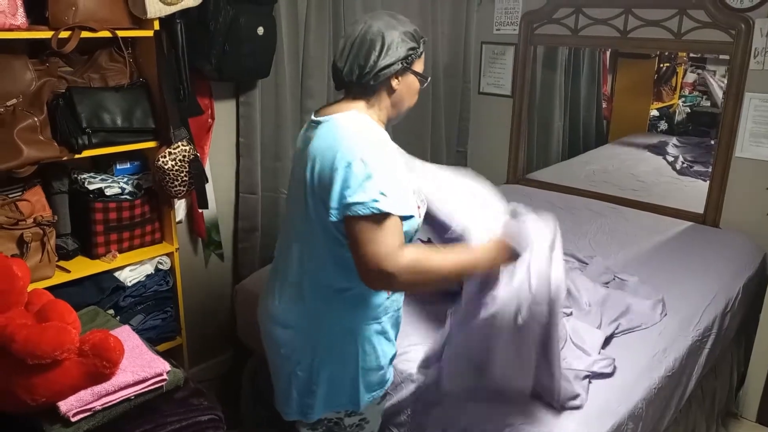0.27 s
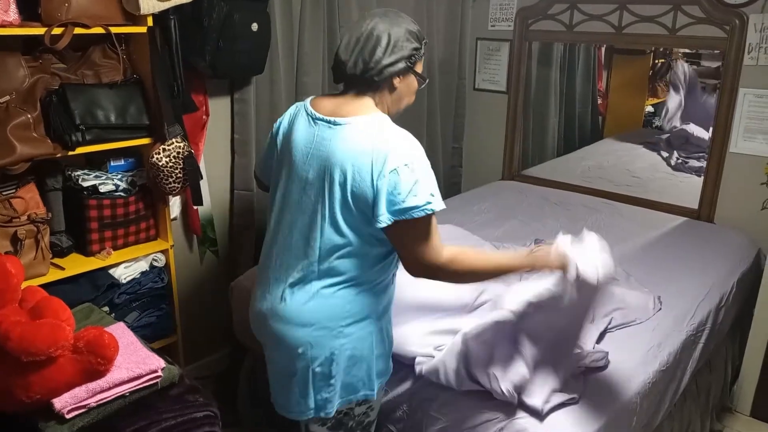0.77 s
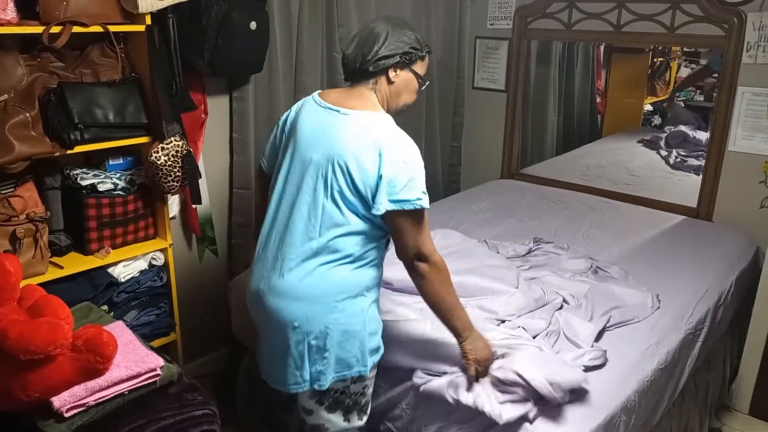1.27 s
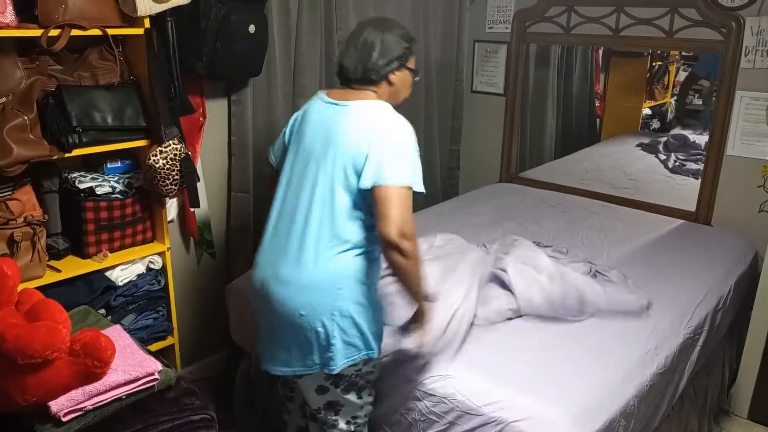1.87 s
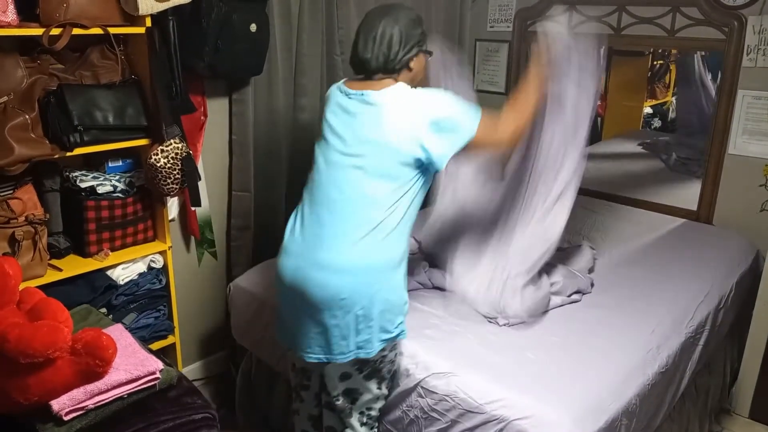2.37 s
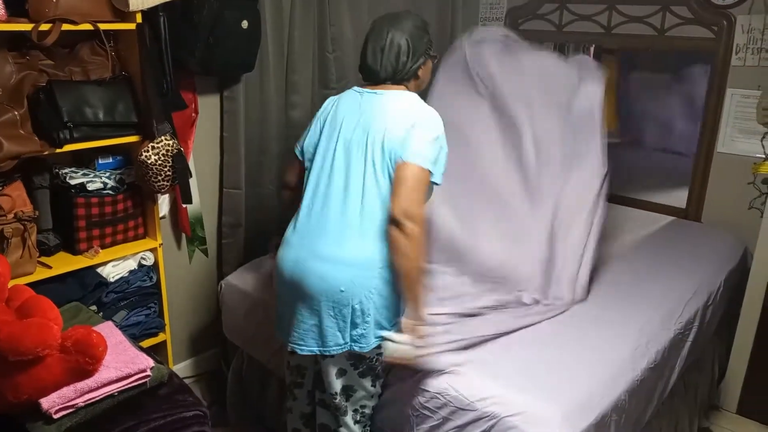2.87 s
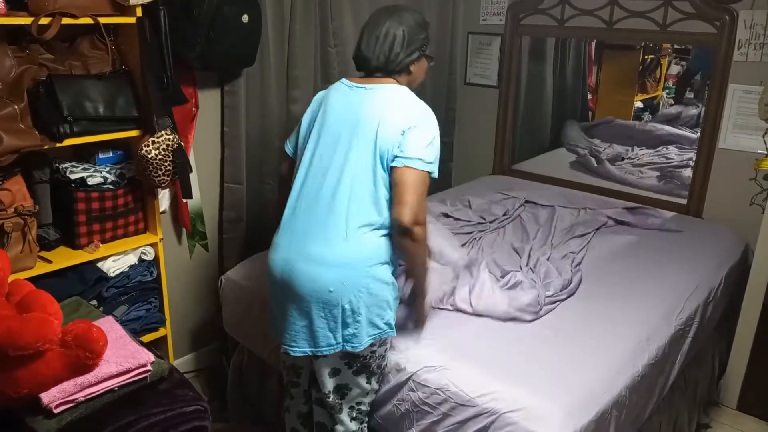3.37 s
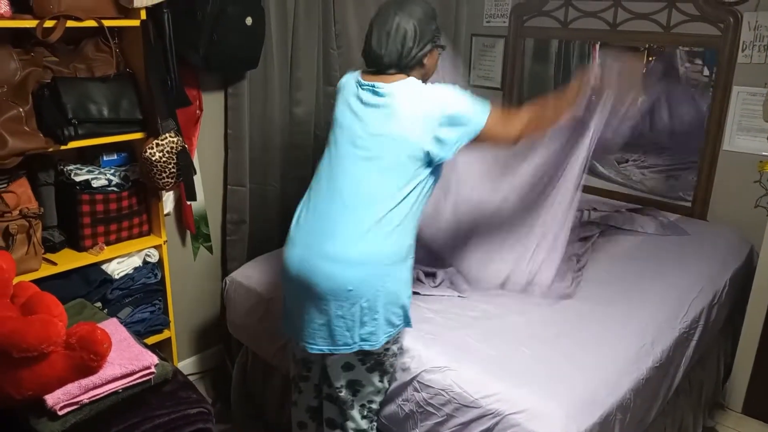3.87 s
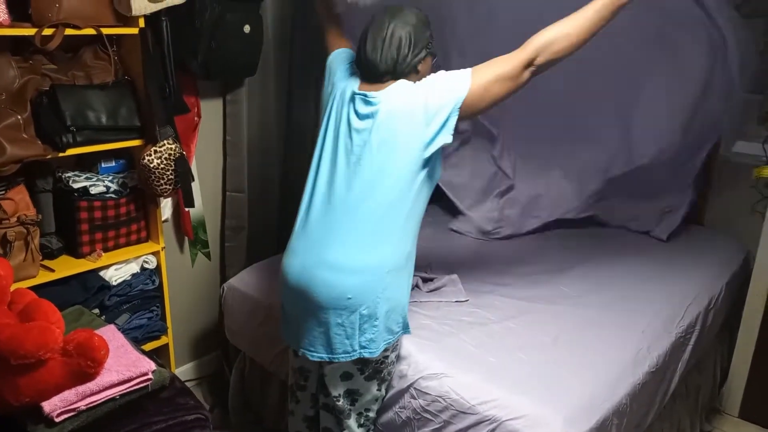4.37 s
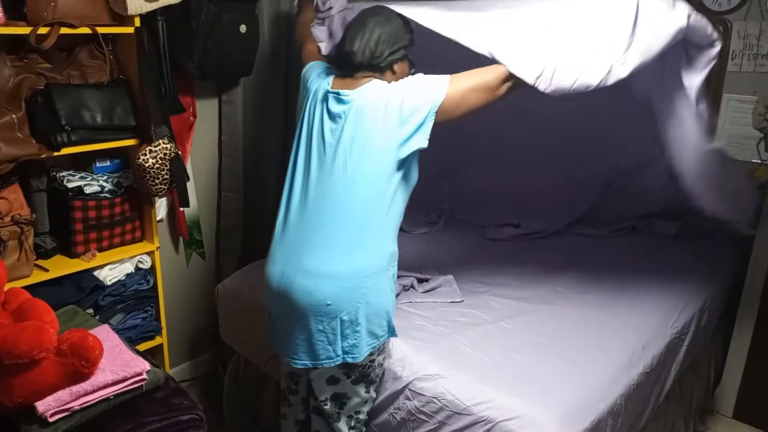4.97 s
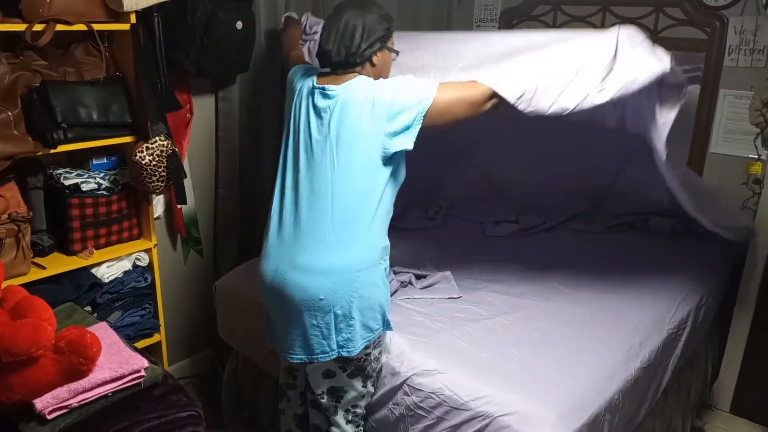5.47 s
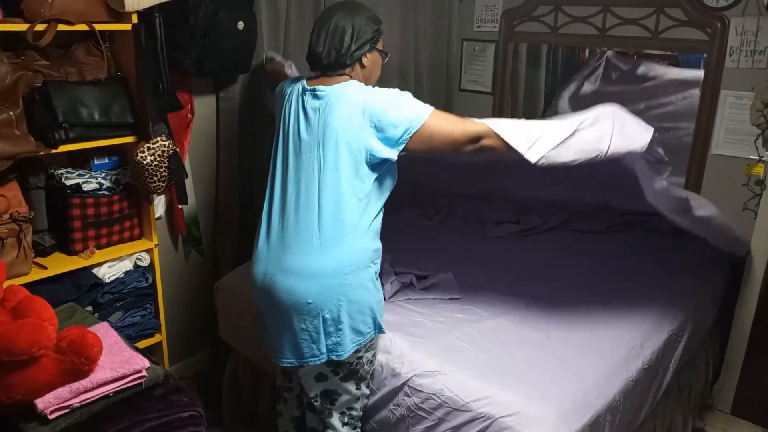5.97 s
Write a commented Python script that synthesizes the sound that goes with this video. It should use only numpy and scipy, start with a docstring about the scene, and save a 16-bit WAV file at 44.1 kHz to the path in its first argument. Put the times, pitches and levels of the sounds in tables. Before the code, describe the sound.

In a small bedroom, a couple of metres from the microphone, someone handles a bed sheet with soft rubs and swishes. A brisk shake brings a burst of flapping cloth, and a second, lighter shake follows. Things grow quieter as the sheet drifts down, with a brief crackle of fabric pulling tight and a few soft, dull footsteps. A steady high hiss, faint hum and low rumble lie underneath.

```python
"""Light swishes and a small flap: a cotton bed sheet is gathered in a small bedroom, then shaken out
twice and left to float down over the bed. Sliding threads swish and rub, loose folds flutter and slap
the air, creases snap taut, and air puffs from under the falling sheet. Feet shift softly, mostly at
the end. A steady high hiss, a faint hum and a low rumble lie under it all."""
import sys
import numpy as np
from scipy import signal
from scipy.fft import rfft, irfft, next_fast_len
from scipy.io import wavfile
from scipy.ndimage import map_coordinates

SR = 44100
rng = np.random.default_rng(int(sys.argv[2]) if len(sys.argv) > 2 else 0)


def persist_wave(psi):
    """Save psi, clipped to +-1, as 16-bit WAV."""
    counts = np.round(np.clip(psi, -1, 1) * 32767).astype(np.int16)
    wavfile.write(sys.argv[1], SR, np.atleast_2d(counts).T)


N = 274292

# swings of the sheet: t/s, length/s, start effort/dB, end effort/dB, extra rub/dB, extra swish/dB
SHEET_SWINGS = [(0.267, .13, -53.5, -49.5, -1.5, -2), (1.146, 0.013, -61, -62, -1, 0),
                (1.443, 0.21, -54, -69, 0.5, 2), (1.712, 0.056, -56.5, -51, -1.5, 0),
                (1.807, 0.068, -44.5, -45.5, 1.5, 3), (2.114, 0.071, -46.5, -39.5, -0.5, 0),
                (2.211, 0.16, -40.5, -40, 2, 1.5), (2.395, 0.12, -40, -48, -11, -7),
                (2.558, 0.063, -24.5, -29.5, -4, -3), (2.656, .06, -34, -31, 1.5, -1),
                (2.715, .10, -38, -41.5, 3.5, 5.5), (2.841, 0.077, -40.5, -43.5, -2, -8.5),
                (3.082, 0.12, -52.5, -48, 1.5, 3), (3.381, 0.1, -45, -50, -3, -2.5),
                (3.624, 0.11, -55.5, -54, 7, 2.5), (3.755, .16, -36, -39.5, -0.5, -2),
                (3.96, 0.096, -53.5, -64, 0, 2.5)]
# light sliding in the hands: t/s, level/dB
HAND_SLIDING = [(0, -57.5), (1.3, -55), (2.0, -57.5), (3.0, -54.5), (4.1, -52.5), (4.35, -63.5),
                (4.6, -57.5), (4.8, -65.5), (5.3, -64), (6.03, -57.5), (6.22, -64.5)]
# folds slapping the air: t/s, push peak/dB, slap re push/dB, ripple re push/dB
FOLD_FLAPS = [(.276, -42.5, -2, 1), (0.295, -40, -27, -22), (2.2234, -26.5, 4, -3),
              (2.269, -27, -16, -15.5), (2.539, -25.5, -6.5, -9.5), (2.553, -15, -8, -15),
              (2.624, -19.5, -23, -11.5), (2.668, -33, 9.5, -4.5), (2.707, -18, -6, -10),
              (2.722, -22, -12.5, -5.5), (3.765, -28.5, -25, -4), (3.828, -34.5, 4.5, -8),
              (3.891, -26, -11, -8.5), (3.921, -26, -36, -6.5), (3.948, -31, -32, -4)]
# creases pulling taut: t/s, level/dB, crack re zip/dB, crack f/Hz, t60/s
CREASE_SNAPS = [(.2754, -49.5, 8.5, 1750, .06), (1.261, -43.5, -22, 1530, .08),
                (1.482, -33, -4.5, 2670, 0.11), (2.273, -41.5, 3, 1560, .06), (2.3445, -38, 3, 1420, 0.089),
                (2.575, -34, 7, 2200, 0.051), (2.7042, -35.5, -1, 1650, .06),
                (2.7124, -27, -17, 1694, .064), (3.3797, -33.5, -1, 2080, .06),
                (3.3984, -42.5, 2, 2140, .16), (3.4494, -44, 2, 2360, 0.14),
                (3.7804, -41.5, 0, 1580, 0.035), (4.9491, -36, -25, 3500, 0.17),
                (4.9564, -34.5, -35, 2360, .04), (4.9674, -37, -17, 2710, 0.06),
                (4.9876, -31.5, -15, 2160, .1)]
# layer dragged over layer: t/s, swish/dB, rub/dB, rub f/Hz, half width/s
LAYER_TUGS = [(0.411, -50, -54, 2500, 0.0087), (.773, -50.5, -60, 2120, 0.028),
              (1.151, -46.5, -51.5, 694, 0.011), (1.308, -51, -59, 1450, 0.018),
              (1.479, -48, -58.5, 880, 0.016), (2.581, -35.5, -37.5, 1850, 0.011),
              (2.711, -31.5, -32, 1040, 0.0086), (4.46, -57.5, -68.5, 904, .035),
              (5.005, -67, -54.5, 2140, 0.023)]
# puffs from under the sheet: t/s, level/dB
AIR_PUFFS = [(4.041, -55.5), (4.171, -55.5), (4.309, -66), (4.46, -66.5), (4.59, -66), (4.79, -67),
             (5.78, -73), (5.96, -71), (6.09, -74)]
# footfalls and shifts of weight: t/s, level/dB
FOOT_STEPS = [(.925, -62), (1.83, -51), (4.913, -58), (5.069, -58), (5.362, -58), (5.775, -55.5),
              (6.015, -42), (6.076, -51)]
# folds pushing air: f/Hz, level/dB
FOLD_SPECTRUM = [(25, -39.5), (60, -12), (88, -11), (115, -9), (160, -6), (210, 0.5), (300, -2.5),
                 (345, -8.5), (385, -5), (460, -10), (540, -23), (660, -15), (1000, -21.5), (1250, -31.5),
                 (5000, -47.5)]
# slapping folds: f/Hz, level/dB
SLAP_SPECTRUM = [(150, -30), (550, 1), (750, 11), (1000, 7), (1400, -15), (2200, -14.5), (5000, -40)]
# rubbing crease: f/Hz, level/dB
CREASE_SPECTRUM = [(400, -25), (850, -8.5), (1500, 0.5), (2200, -1.5), (2800, -4.5), (4200, -7.5),
                   (6500, -23), (12000, -42.5)]
# slipping threads: f/Hz, level/dB
WEAVE_SPECTRUM = [(900, -23.5), (2500, -18), (4000, -8), (5200, -6.5), (6500, 0.5), (7450, 0.5),
                  (8200, -14.5), (9100, -18.5), (10200, -15), (11500, -9), (12800, -15), (13900, -21),
                  (14800, -7), (15800, -7)]
# air spilling past the hem: f/Hz, level/dB
AIR_SPECTRUM = [(40, -13), (140, -12), (200, -4), (280, -1.5), (400, -19), (600, -25), (2000, -60)]
# heel on the floor: f/Hz, level/dB
HEEL_SPECTRUM = [(20, -21), (50, 1), (90, 2), (160, -9), (300, -31), (1000, -53)]
# bedroom decay: f/Hz, t60/s
ROOM_DECAY = [(100, 0.77), (300, 0.17), (2000, 0.2), (12000, 0.24)]
# high hiss: f/Hz, level/dB
HISS_SPECTRUM = [(300, -12), (700, -10), (1200, -17), (2000, -27), (3200, -64), (5000, -13), (5800, 3),
                 (7400, -1), (8200, -6), (9000, -25), (11500, -6.5), (13800, -19.5), (15000, -10.5),
                 (15800, -6)]
# narrow bands singing in the hiss: f/Hz, width/Hz, level/dB
WHINE_BANDS = [(1360, 120, -12), (1889, 96, 0), (3763, 74, 3), (4274, 55, 8), (4484, 135, 3.5),
               (5020, 200, -8), (5400, 93, 2), (5633, 53, 10.5), (5650, 150, 1), (6300, 28, 9.5),
               (6860, 190, 7.5), (7180, 110, 9.5), (7480, 68, 11), (8320, 190, 0.5)]
# low rumble: f/Hz, level/dB
RUMBLE_SPECTRUM = [(20, -27.5), (50, -6), (88, -2.5), (125, 0), (250, -12.5), (450, -19), (900, -27),
                   (2500, -79)]


def moving_cloth():
    """Folds buckle in small pushes of air; bunches rub in coarse grains, threads slip in fine ones."""
    flutter_db, rub_db, swish_db = cloth_levels()
    ripple = wobble(rate_hz=45)  # waves running through the cloth
    folds = coloured(grains(rate_hz=900, spread_db=4), FOLD_SPECTRUM)
    flutter = amp(flutter_db - 1 + 1.6 * ripple) * shifting(folds, depth_db=1, size=1024)
    patter_db = 0.62 * flutter_db + 0.48 * rub_db  # fold on fold: needs both flutter and sliding
    slaps = coloured(grains(rate_hz=650, spread_db=0), SLAP_SPECTRUM)
    patter = amp(patter_db - 0.5 + 1.2 * ripple) * shifting(slaps, depth_db=4, size=512)
    catches = coloured(grains(rate_hz=2200, spread_db=3), CREASE_SPECTRUM)
    rub = amp(rub_db - 3 + 2.1 * ripple) * shifting(catches, depth_db=2.5, size=256)
    swish_gain = amp(swish_db - 1.5 + 1.7 * wobble(rate_hz=49))
    threads = coloured(grains(rate_hz=12000, spread_db=1.5), WEAVE_SPECTRUM)
    swish = swish_gain * shifting(threads, depth_db=3, size=512)
    return flutter + patter + rub + swish


def cloth_levels(brisk_db=-40.5, brisk_attack_db_per_s=650.5, release_db_per_s=361, linger=1.4):
    """Flutter, rub and swish in dB. Friction grows more slowly with effort than flutter, and lingers."""
    t = np.arange(N) / SR
    hand_db = np.interp(t, *np.transpose(HAND_SLIDING), left=-120, right=-120)
    flutter_db, rub_db, swish_db = [hand_db - 20], [hand_db - 17], [hand_db]
    for start_s, length_s, first_db, last_db, extra_rub_db, extra_swish_db in SHEET_SWINGS:
        end_s = start_s + length_s
        attack_db_per_s = brisk_attack_db_per_s * amp(0.18 * (first_db - brisk_db))  # harder is faster
        onset_db = attack_db_per_s * np.maximum(start_s - t, 0)
        effort_db = np.interp(t, [start_s, end_s], [first_db, last_db]) - onset_db
        release_db = release_db_per_s * np.maximum(t - end_s, 0)
        slide_db = effort_db - release_db / linger - brisk_db
        flutter_db.append(effort_db - release_db)
        rub_db.append(-50.5 + extra_rub_db + 0.83 * slide_db)
        swish_db.append(-45 + extra_swish_db + 0.62 * slide_db)
    return power_sum_db(flutter_db), power_sum_db(rub_db), power_sum_db(swish_db)


def flaps(ripple_t60_s=0.082, ripple_rise_s=0.004):
    """A fold whips over: one push of air and a slap, then the cloth ripples out."""
    out, t = np.zeros(N), np.arange(SR // 4) / SR
    thin_fold = [(hz, db - 4 * (hz < 130)) for hz, db in FOLD_SPECTRUM]  # a quick flap has little bass
    impulse = 1.0 * (t == 0)
    push, slap = coloured(impulse, thin_fold), coloured(impulse, SLAP_SPECTRUM)
    push, slap = push / abs(push).max(), slap / abs(slap).max()
    envelope = (1 - np.exp(-t / ripple_rise_s)) * amp(-60 * t / ripple_t60_s)
    for start_s, level_db, slap_db, ripple_db in FOLD_FLAPS:
        ripple = amp(ripple_db) * envelope * noise(len(t), thin_fold)
        add(out, start_s, amp(level_db) * (push + amp(slap_db) * slap + ripple))
    return out


def snaps():
    """A crease pulls straight: a pitched crack and a quick zip of threads."""
    out, t = np.zeros(N), np.arange(SR // 4) / SR
    strike = (1 - np.exp(-t / 0.0002)) * (1 + 1.3 * np.exp(-t / 0.003))
    dull_weave = [(hz, db - 5 * (hz > 8500)) for hz, db in WEAVE_SPECTRUM]
    for start_s, level_db, crack_db, crack_hz, t60_s in CREASE_SNAPS:
        weave_slips, crease_slips = slips(len(t))
        thread_zip = coloured(weave_slips, dull_weave)
        crack = amp(crack_db) * coloured(crease_slips, resonant(CREASE_SPECTRUM, crack_hz, boost_db=9))
        envelope = strike * amp(level_db - 7.5 - 60 * t / t60_s)
        add(out, start_s, envelope * (thread_zip + crack))
    return out


def tugs():
    """One layer drags over another, swelling and fading with the speed of the hand."""
    out, t = np.zeros(N), np.arange(SR // 5) / SR
    middle_s = t.mean()
    for peak_s, swish_db, rub_db, rub_hz, half_width_s in LAYER_TUGS:
        weave_slips, crease_slips = slips(len(t))
        swish = amp(swish_db) * coloured(weave_slips, WEAVE_SPECTRUM)
        rub = amp(rub_db) * coloured(crease_slips, resonant(CREASE_SPECTRUM, rub_hz, boost_db=16.5))
        envelope = np.exp(-((t - middle_s) / half_width_s) ** 2)
        add(out, peak_s - middle_s, envelope * (swish + rub))
    return out


def billow(half_width_s=0.06):
    """Air spills in soft puffs from under the floating sheet."""
    t = np.arange(N) / SR
    puffs = sum(amp(db) * np.exp(-((t - peak_s) / half_width_s) ** 2) for peak_s, db in AIR_PUFFS)
    return puffs * amp(1.7 * wobble(rate_hz=14)) * noise(N, AIR_SPECTRUM)


def footfalls(floor_hz=88, rise_s=0.028, scuff_db=-11):
    """A soft heel makes the floor boom for a few cycles, with a dull scuff."""
    out, t = np.zeros(N), np.arange(SR // 3) / SR
    swell = (t / rise_s) ** 2 * np.exp(2 * (1 - t / rise_s))
    boom = swell * np.sin(2 * np.pi * floor_hz * t)
    for start_s, level_db in FOOT_STEPS:
        scuff = amp(scuff_db) * np.sqrt(swell) * noise(len(t), HEEL_SPECTRUM)
        add(out, start_s, amp(level_db - 0.5) * (boom + scuff))
    return out


def bedroom(x):
    """Short, dense reflections from walls and furniture, 5 ms late."""
    hz, t, bins = signal.stft(rng.standard_normal(SR // 2), SR, nperseg=256)
    decay = amp(-60 * t / log_interp(ROOM_DECAY, hz)[:, None])
    tail = signal.istft(bins * decay, SR, nperseg=256)[1]
    delayed = np.pad(x, (SR // 200, 0))
    return signal.fftconvolve(delayed, tail / np.linalg.norm(tail))[:N]


def background(hiss_db=-62.5, hum_hz=462):
    """Hiss with wavering narrow bands, a faint hum and an uneven rumble."""
    def bands(f):
        return sum(amp(db) * np.exp(-2 * ((f - hz) / width_hz) ** 2) for hz, width_hz, db in WHINE_BANDS)

    hiss = shifting(noise(N, HISS_SPECTRUM), depth_db=5, size=1024)
    whine = shifting(filtered(rng.standard_normal(N), bands), depth_db=2.6, size=512)
    hum = amp(-85 + 2 * wobble(rate_hz=3)) * np.sin(2 * np.pi * hum_hz * np.arange(N) / SR)
    rumble = amp(-73.5 + 3.5 * wobble(rate_hz=9)) * noise(N, RUMBLE_SPECTRUM)
    return amp(hiss_db) * (hiss + whine) + hum + rumble


def grains(rate_hz, spread_db):
    """Random impulses of uneven size, rms 1."""
    hits = rng.random(N) < rate_hz / SR
    signs = rng.choice([-1, 1], N)
    return unit_rms(hits * signs * amp(spread_db * np.clip(rng.standard_normal(N), -2, 2)))


def slips(size, spread_db=4.5):
    """Two runs of threads catching and letting go, uneven in strength."""
    return rng.standard_normal((2, size)) * amp(spread_db * rng.standard_normal(size))


def noise(size, spectrum):
    """Coloured Gaussian noise, rms 1."""
    return coloured(rng.standard_normal(size), spectrum)


def wobble(rate_hz):
    """Smooth random curve with knots at rate_hz."""
    knots = rng.standard_normal(int(N * rate_hz / SR) + 4)
    return map_coordinates(knots, [np.arange(N) * rate_hz / SR])


def shifting(x, depth_db, size):
    """Patches of the spectrum swell and fade at random; rms 1."""
    bins = signal.stft(x, nperseg=size)[2]
    patch = np.outer(np.hanning(7), np.hanning(9))
    field = signal.fftconvolve(rng.standard_normal(bins.shape), patch, "same")
    return unit_rms(signal.istft(bins * amp(depth_db * unit_rms(field)), nperseg=size)[1][:N])


def coloured(x, spectrum, size=4096):
    """Minimum-phase filter with the given spectrum; output rms 1."""
    gain = amp(log_interp(spectrum, np.fft.rfftfreq(size, 1 / SR)))
    cepstrum = irfft(np.log(gain))
    causal_window = 1 + np.sign(size // 2 - np.arange(size))
    causal_window[0] = 1
    kernel = irfft(np.exp(rfft(cepstrum * causal_window)))
    return unit_rms(signal.fftconvolve(x, kernel)[:len(x)])


def filtered(x, response):
    """Zero-phase filter with gain response(hz)."""
    size = next_fast_len(len(x) + SR // 4)
    return irfft(rfft(x, size) * response(np.fft.rfftfreq(size, 1 / SR)), size)[:len(x)]


def resonant(spectrum, peak_hz, boost_db):
    """Spectrum with one extra resonance."""
    hz = np.geomspace(100, 16000, num=120)
    peak_db = boost_db / (1 + (6 * np.log(hz / peak_hz)) ** 2)
    return np.transpose([hz, log_interp(spectrum, hz) + peak_db])


def log_interp(points, hz):
    """Read (f/Hz, value) points on a log frequency axis."""
    points_hz, values = np.transpose(points)
    return np.interp(np.log(hz + 1), np.log(points_hz + 1), values)


def power_sum_db(levels_db):
    """Level of several sounds at once."""
    return 10 * np.log10(sum(amp(db) ** 2 for db in levels_db) + 1e-20)


def amp(db):
    """dB to gain."""
    return 10 ** (np.asarray(db) / 20)


def unit_rms(x):
    """Scale to rms 1."""
    return x / np.sqrt(np.mean(x ** 2) + 1e-20)


def add(track, start_s, sound):
    """Mix a sound into the track."""
    start = max(round(start_s * SR), 0)
    track[start:start + len(sound)] += sound[:N - start]


def scene():
    """Sheet, room, feet and background from a couple of metres away; mono."""
    sheet = moving_cloth() + flaps() + snaps() + tugs() + billow()
    return (sheet + amp(-12) * bedroom(sheet) + footfalls() + background())[None]


def record(dry):
    """Microphone channel: nothing above its band limit."""
    return filtered(dry[0], lambda hz: hz < 15790)[None]


dry = scene()
out = record(dry)
persist_wave(out)
```